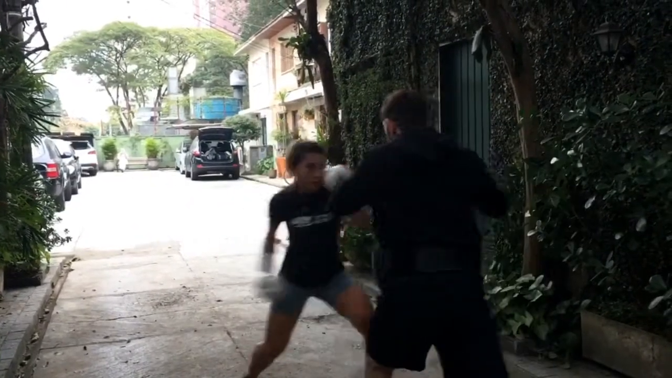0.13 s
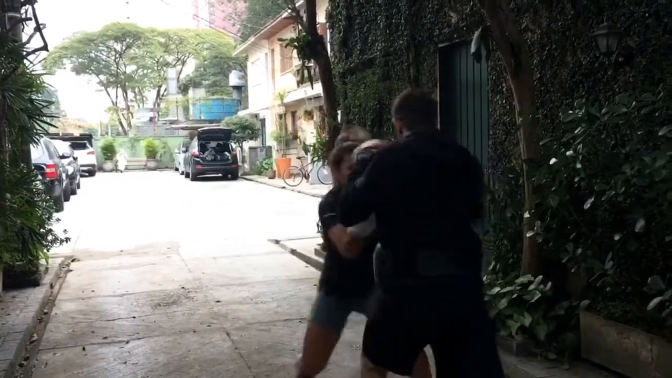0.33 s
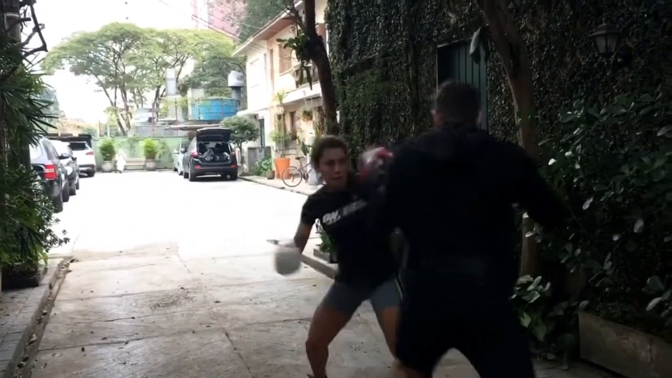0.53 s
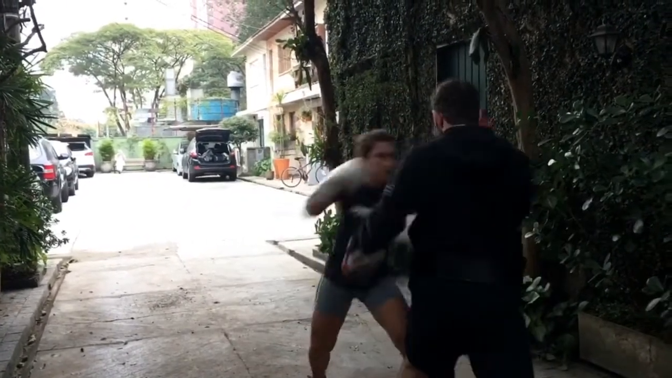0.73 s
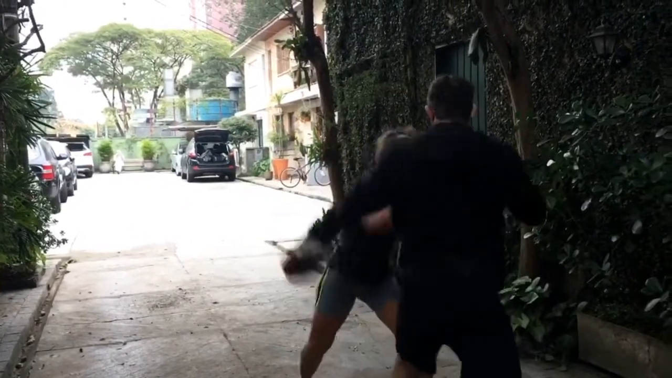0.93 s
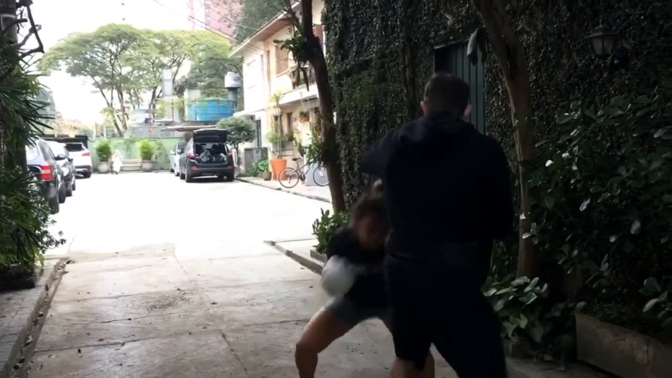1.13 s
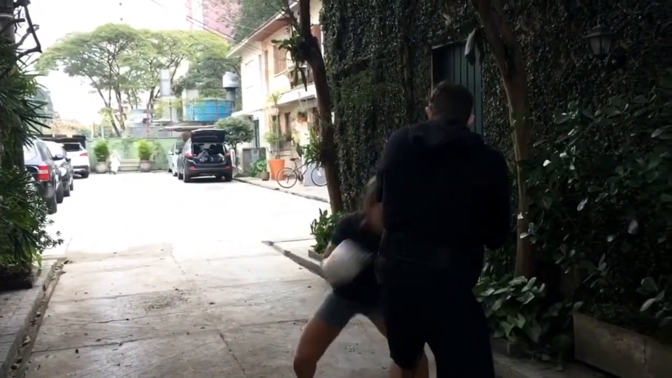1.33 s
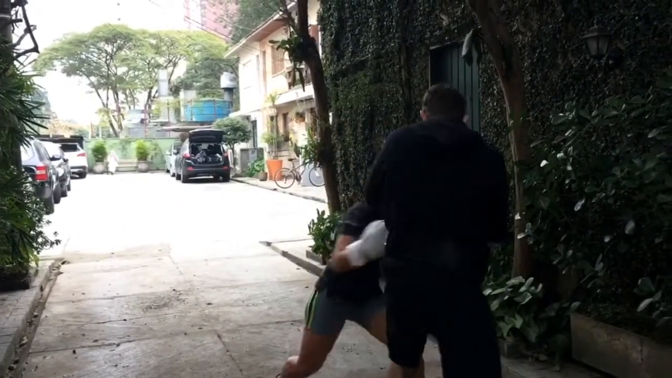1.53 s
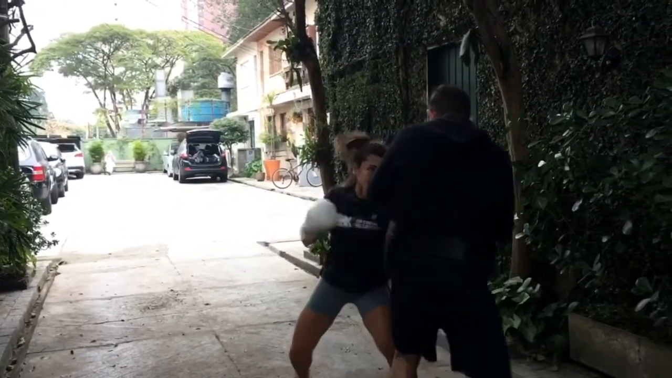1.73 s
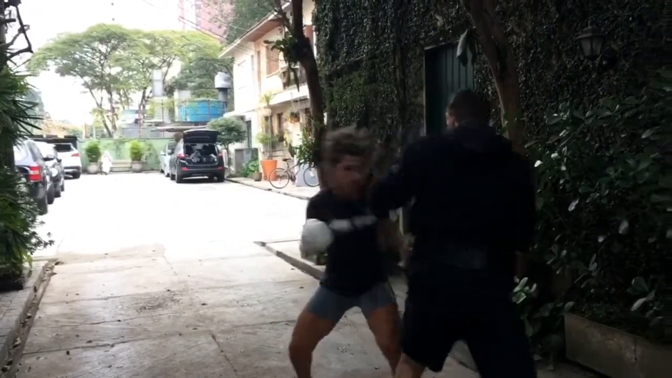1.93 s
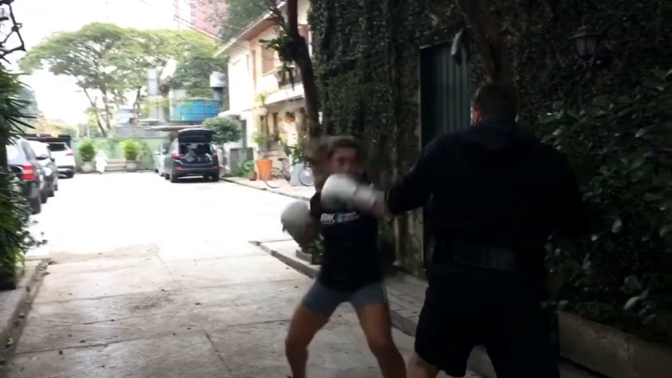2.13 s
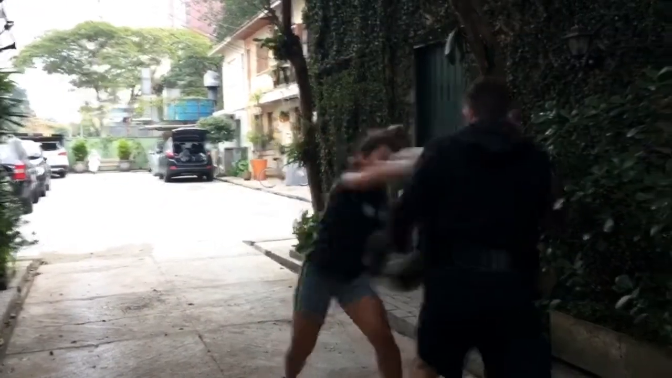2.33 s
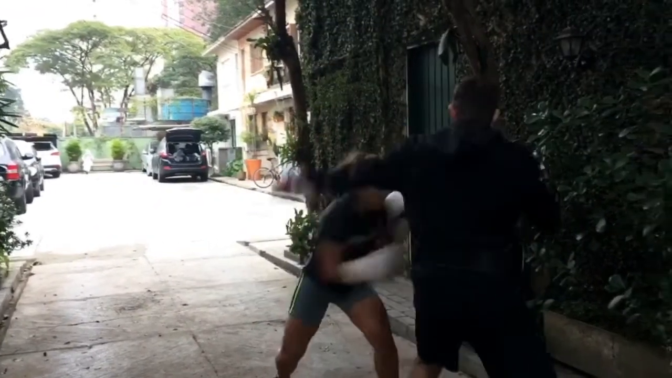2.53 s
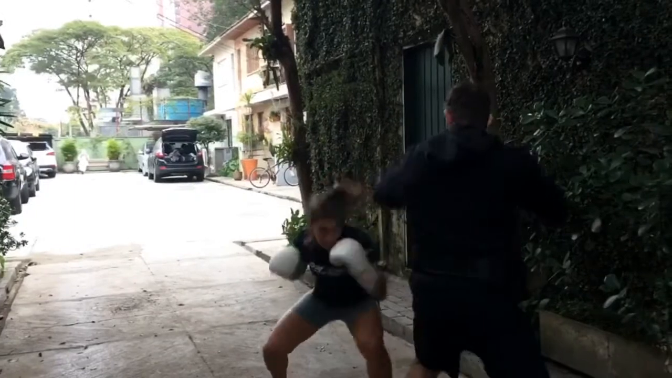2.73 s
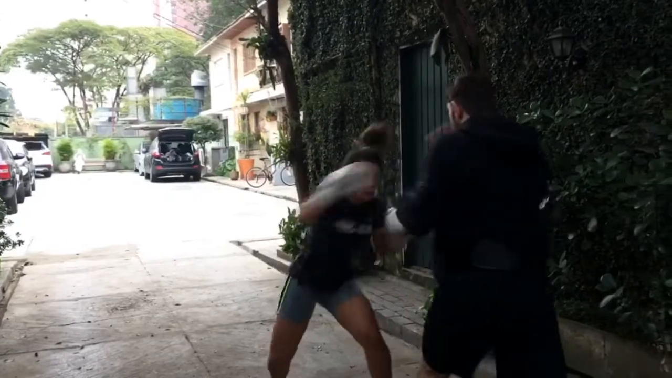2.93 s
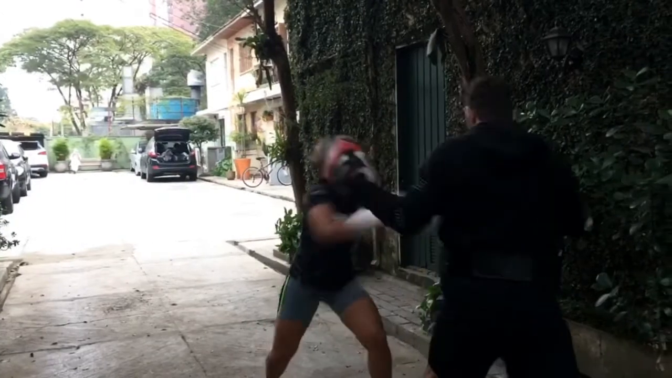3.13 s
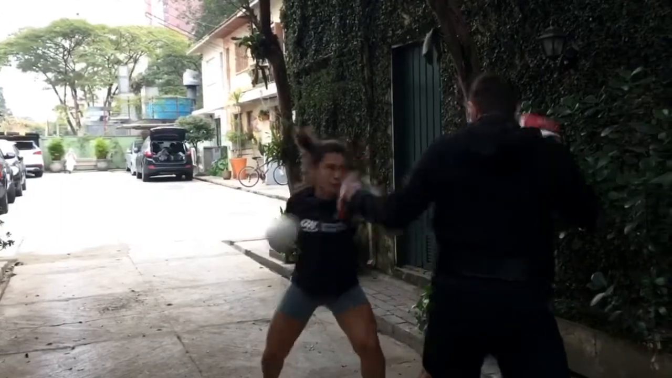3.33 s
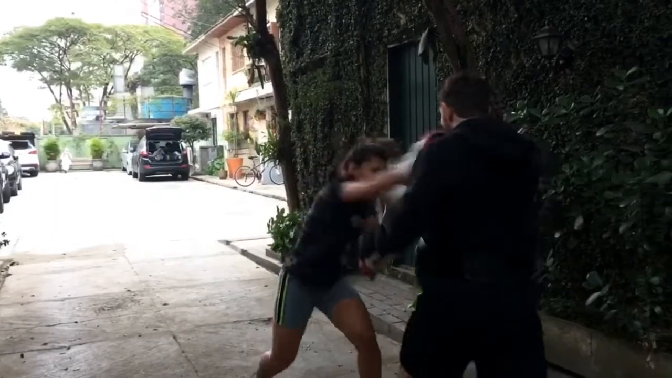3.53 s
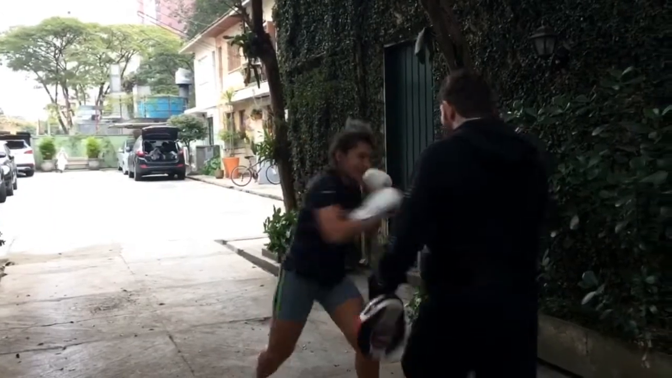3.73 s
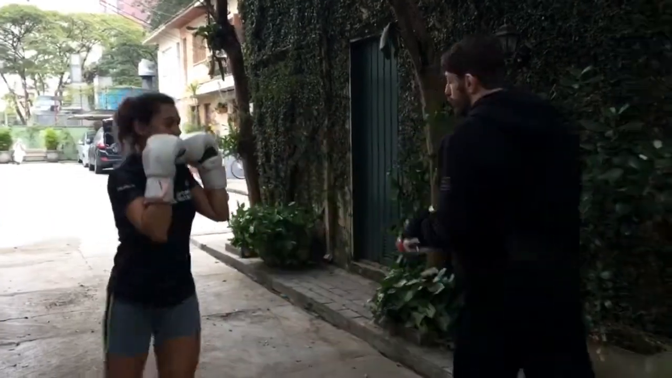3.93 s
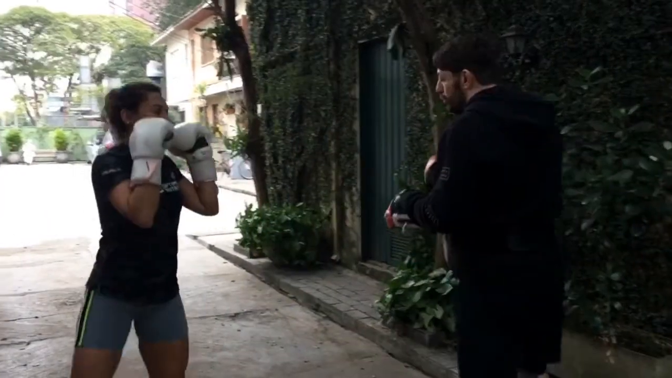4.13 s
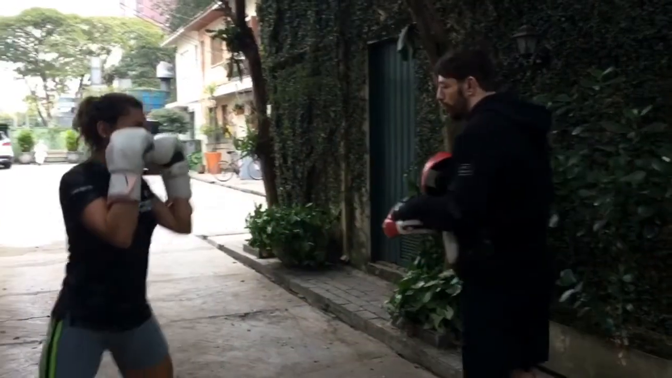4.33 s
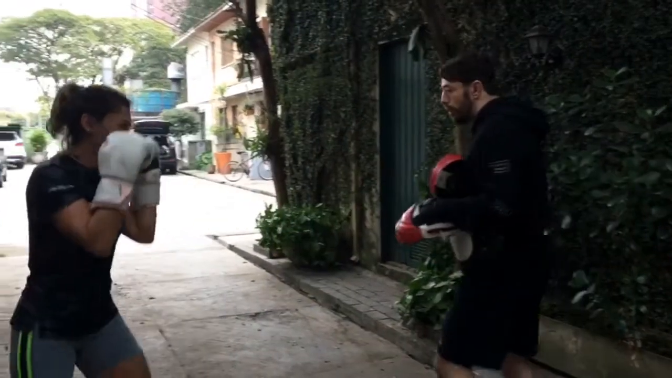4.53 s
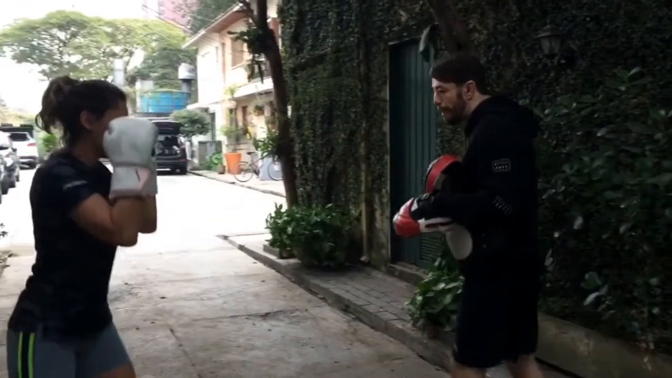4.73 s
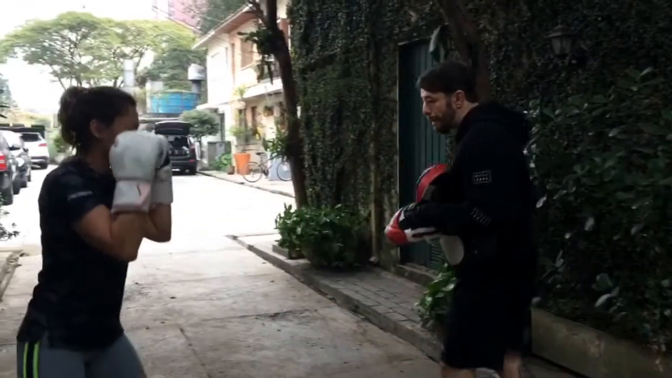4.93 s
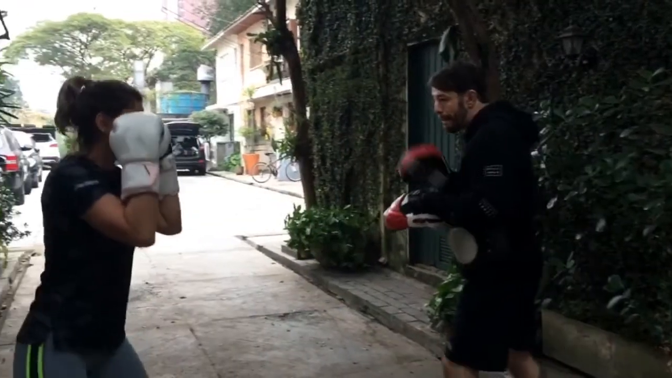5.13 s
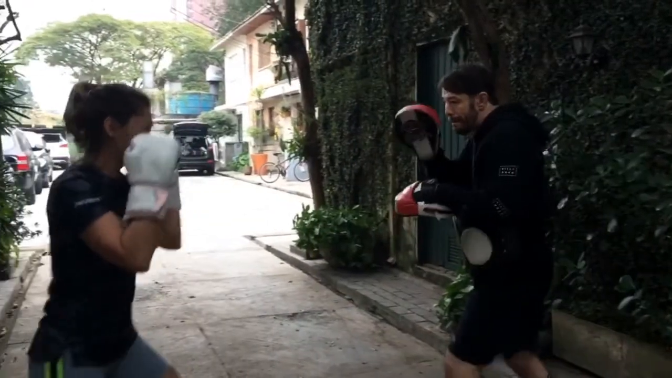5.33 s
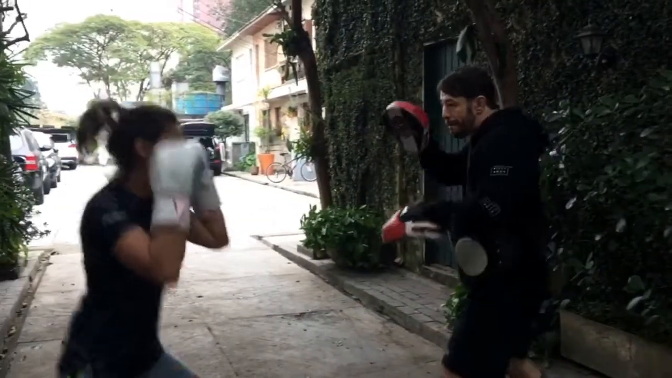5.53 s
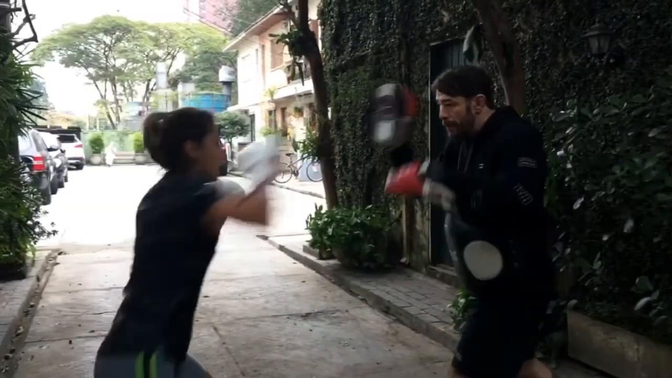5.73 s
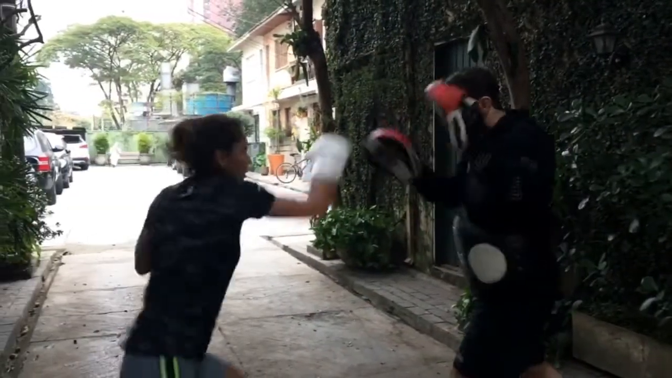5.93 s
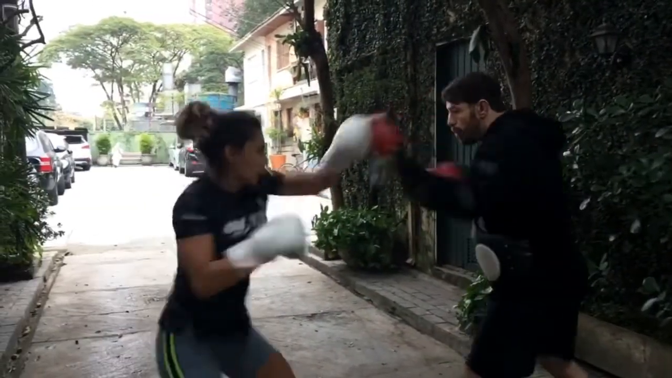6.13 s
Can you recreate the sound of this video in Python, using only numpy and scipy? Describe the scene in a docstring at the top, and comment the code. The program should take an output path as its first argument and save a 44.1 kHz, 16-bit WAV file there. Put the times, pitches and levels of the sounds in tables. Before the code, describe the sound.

Throughout, low city rumble and soft hiss lie under a faint thin motor tone; a steady low hum near 130 Hz is clear at first. Gloves hit padded mitts at about 0.16, 0.45, 0.71, 1.3, 1.6, 1.97, 2.27, 2.9, 3.16 and 3.43 s: leathery cracks with dull thuds and low body booms, short echoes from near walls. The hits at 0.71, 1.97 and 3.43 are sharpest; 2.27 is soft and smeared. Between them soles and sleeves scuff, grit ticks, and a narrow rustle hisses at 1.03. At 3.83 the hum drops steeply. A low wind puff comes at 4.2, a faint high whistle at 4.56, then a harsh bird chirp at 4.74 slides into a clear falling note at 4.82. Another puff at 5.1, scuffs, a very sharp slap at 5.7, a punchy one at 6.0, and a tiny chirp at 6.26.

```python
"""City rumble, a motor's hum and a thin band of hiss sound throughout, as shaped noise and sines.
From the start gloves slap padded mitts (noise bursts, resonances, a late boom) in an echoing paved lane,
while soles and sleeves scuff, grit ticks and, at 1.03 s, a narrow hiss rustles.
At 3.83 s the hum falls steeply; then wind puffs, a far call whistles, and harsh bird partials
slide into one falling note; another puff, two more slaps and a last short chirp follow."""
import sys
import numpy as np
from scipy import signal
from scipy.fft import rfft, irfft
from scipy.io import wavfile
from scipy.ndimage import uniform_filter1d

SR = 44100
rng = np.random.default_rng(int(sys.argv[2]) if len(sys.argv) > 2 else 0)


def to_wav(sig):
    """Store sig (one row per channel, or 1-D mono) as 16-bit WAV at the path in sys.argv[1].

    Samples outside -1..1 are clipped; the rate is SR.
    """
    pcm = np.clip(np.atleast_2d(sig), -1, 1) * 32767
    pcm = np.round(pcm).astype(np.int16)
    wavfile.write(sys.argv[1], SR, pcm.T)  # frames by channels


N = 277256  # samples
T = np.arange(N) / SR  # s

# City spectrum, shape only: hz, density_db (per Hz)
CITY_SPECTRUM = [(12, -33), (22, 8.5), (43, 5.5), (69, -4.5), (127, -14), (180, -18.5), (320, -21.5),
                 (470, -26), (1100, -26), (2500, -30), (3600, -36), (4800, -41.5), (6500, -47),
                 (9000, -50.5), (12000, -47.5), (16300, -50)]
HISS_DB, HISS_AFTER_DB, RUMBLE_DB, RUMBLE_WAVER_DB = -42.5, -43.5, -34, 0.1
STEP_S = 3.83  # the hum, and slightly the hiss, drop here

# Motor hum partials: multiple, relative_level_db, noise_width_hz
HUM_PARTIALS = [(1, 6, 7), (2, -13, 14), (3, -14.5, 8.4)]
HUM_HZ, HUM_DB, HUM_AFTER_DB, HUM_WAVER_DB = 133.8, -32, -46.5, 1.2
# Mean level of the motor's thin tone: time_s, level_db
WHINE_LEVEL = [(0, -63), (1.3, -57), (2.0, -52.5), (5.7, -53.5), (6.1, -61)]
WHINE_HZ = 2137.5

DRONE_HZ, DRONE_WIDTH_HZ, DRONE_DB, DRONE_WAVER_DB = 2790, 200, -57, 4.5

# Wind at the microphone: start_s, length_s, level_db
WIND_PUFFS = [(4.17, 0.277, -30.5), (5.1, .3, -32)]
# Wind spectrum, shape only: hz, density_db (per Hz)
WIND_SPECTRUM = [(60, -9), (120, -2.5), (190, 0.1), (300, -2), (380, -10), (480, -23), (900, -49)]

# One narrow hiss: start_s, length_s, level_db
NARROW_RUSTLE = (1.03, .14, -46)
# One far thin call: start_s, length_s, pitch_hz, level_db
FAR_WHISTLE = (4.56, .165, 3945, -53)

# Harsh bird stacks: start_s, length_s, starting_fourth_partial_hz, level_db, relative_fourth_db
BIRD_CHIRPS = [(4.735, .095, 4180, -44, 2), (6.262, .03, 4150, -44, -12)]
# Partials beside the fourth: multiple, relative_level_db
BIRD_PARTIALS = [(3, -4), (5, 1), (5.5, -13), (6, -11)]
CHIRP_RISE_HZ_PER_S = 2000  # of the fourth partial
CHIRP_ROUGH, CHIRP_BLUR_PER_S = .05, 13  # starting noise share 0-1, its growth
# One falling note: start_s, length_s, from_hz, to_hz, level_db, noise_share (0-1)
FALLING_NOTE = (4.824, .058, 4270, 3720, -30, .12)

# Cracking grit: start_s, click_peak_db, body_peak_db
GRIT_TICKS = [(0.3564, -20.5, -46), (0.8101, -38, -28), (0.9333, -48, -30), (2.505, -43, -38),
              (3.0035, -26, -27.5), (3.7664, -43, -35), (3.8204, -22, -23.5), (4.875, -35, -24),
              (6.175, -25, -28)]
# Dragging soles and sleeves: start_s, length_s, level_db, centre_hz, relative_hiss_db, resonant_share (0-1)
FRICTION_SCUFFS = [(.225, 0.058, -39, 1420, -6.5, .6), (.42, .025, -43, 960, -9, .6),
                   (.51, .045, -40, 1350, -13, 0), (.74, 0.4, -41, 2250, -17, 0),
                   (.79, 0.079, -42, 2960, -3, .55), (.925, 0.068, -39.5, 2910, -18, 0.3),
                   (1.012, .06, -40, 2840, -12, .5), (1.072, 0.16, -46, 2860, -10.5, 0.1),
                   (1.392, 0.14, -39, 1600, -32, 0.57), (2.182, .07, -45.5, 1530, -11, 0.3),
                   (2.28, 0.065, -43, 2250, -1, .2), (2.503, 0.042, -41.5, 1750, -15, 0.1),
                   (2.549, 0.033, -34, 990, -30, .9), (2.582, 0.046, -41, 2270, -16, 0.1),
                   (2.805, 0.098, -33, 1910, -17, 0.5), (2.896, 0.052, -38, 1460, -26, 0.6),
                   (3.712, .1, -35, 1480, -32, 0.43), (5.662, .033, -40, 2060, -10, 0.1),
                   (6.075, 0.11, -38.5, 1450, -7, 0.07)]

# Near-wall echoes before dulling: shortest_delay_s, level_db
NEAR_WALLS = [(.005, -8), (.009, -10), (.016, -15), (0.021, -15)]
# Reverberation of the lane: hz, t60_s
LANE_DECAY = [(100, 0.63), (400, 0.23), (1500, 0.31), (4000, 0.28), (12000, 0.28)]
FAR_WALL_S, FAR_WALL_DB = .031, -23

# Slaps, and two sharp wall echoes of slaps (1.990, 3.462); levels are those before the lane:
# start_s, crackle_peak_db, crack_peak_db, thud_peak_db, thud_tilt_db (per octave),
# boom_peak_db, leather_tilt_db (per octave), rise_ms (time constant), squash_ms (t60)
SLAPS = [ (0.157, -15, -21, -16, 1, -15, 1.5, 12, 87), (0.447, -13.5, -25, -10, 2, -13.5, 3.5, 1.14, 81),
         (0.7082, -8.5, -13, -4, 4, -12, 1, 4, 30), (.716, -7, -13.5, -37, .1, -34, -4, 0.48, 35),
         (1.310, -19.5, -23, -17.5, 5, -17.5, 4, 1.9, 56), (1.622, -10.5, -23, -10, -4, -23, 4.5, 2.1, 61),
         (1.974, -2.5, -7.5, -7, 7, -22, 2.5, 0.94, 38), (1.990, -41, -0.5, -23, -8, -40, -0.5, 0.44, 44),
         (2.267, -18.5, -40, -17.5, -0.5, -18.5, 2, 9.9, 135),
         (2.885, -21, -19.5, -16.5, -5, -35, 1, 1.2, 53),
         (3.159, -8.5, -36, -2.5, -7, -11.5, -12, 0.79, 41),
         (3.4305, -5, -26, -1.5, -3, -14, 0.4, 0.46, 88), (3.462, -28, -3.5, -28, -1, -40, -5, 0.81, 31),
         (5.6958, -9.5, 1, -6, 0.5, -17.5, 0, 1, 98), (6.0096, -4, -8, -6, -15, -16, 1.5, 0.27, 54)]
# Resonances of the padding before the tilt: hz, width_hz, relative_level_db
PADDING_MODES = [(143.4, 44, 12.5), (183, 127, 18.5), (255, 46, 17.5), (320, 39, 7), (464, 300, -28),
                 (633, 120, 14)]
# The body sways under the blow: hz, width_hz, delay_s (before the rise time is added)
BODY_BOOM = (48.5, 41, 0.0197)
# Leather spectrum before the tilt, shape only: hz, density_db (per Hz)
LEATHER_SPECTRUM = [(200, -28), (400, -15.5), (800, 0.5), (1700, -2.5), (2500, -8.5), (3500, -11),
                    (4800, -22), (6500, -25.5), (9000, -30), (12000, -30), (16000, -45)]

# Treble response of the microphone: hz, response_db
MICROPHONE_RESPONSE = [(3900, 1.24), (4300, -2), (4800, -7), (5400, -3), (6300, -1.3), (9600, -6.5),
                       (10300, -14), (11500, -11), (13000, -15)]
EDGE_HZ = 16150  # upper band limit


def gain_of(db):
    """Definition of the decibel: amplitude ratio from level."""
    return 10 ** (np.asarray(db) / 20)


def evened(x):
    """Normalization to unit root-mean-square power."""
    return x / np.sqrt(np.mean(x ** 2) + 1e-20)


def peaked(x):
    """Normalization to unit peak amplitude."""
    return x / abs(x).max()


def read(points, hz):
    """Interpolation of a curve along logarithmic frequency."""
    f, value = np.transpose(points)
    return np.interp(np.log(hz + 1), np.log(f + 1), value)


def add(mix, s, sound):
    """Superposition: a sound is summed into the mix from s seconds on."""
    part = mix[round(s * SR):][:len(sound)]
    part += sound[:len(part)]


def coloured(x, db_at):
    """Linear filtering: the spectrum is multiplied by the gain db_at(hz)."""
    hz = np.fft.rfftfreq(len(x), 1 / SR)
    return irfft(rfft(x) * gain_of(db_at(hz)), len(x))


def resonate(x, hz, width):
    """Resonance by heterodyning: hz is shifted to zero, smoothed, and shifted back."""
    turn = np.exp(2j * np.pi * np.cumsum(hz * np.ones(len(x))) / SR)
    r = np.exp(-np.pi * width / SR)
    smooth = signal.lfilter([1 - r], [1, -r], x / turn + 1e-18)
    return 2 * (turn * smooth).real


def evenly_spread(x):
    """Spectral averaging: fine colour is levelled while energy and broad spectrum stay."""
    spectrum = rfft(x, 2 * len(x))
    broad = np.sqrt(uniform_filter1d(abs(spectrum) ** 2, size=len(x) // 50 + 1) + 1e-20)
    fine = abs(spectrum) / broad
    even = irfft(spectrum / np.maximum(fine, .3))[:len(x)]
    return even * np.linalg.norm(x) / np.linalg.norm(even)


def stroke(length, peak, ends_db):
    """Envelope of exponential growth and decay: straight lines in dB, with soft edges."""
    u = np.linspace(0, 1, round(length * SR))
    level_db = np.interp(u, [0, peak, 1], [ends_db, 0, ends_db])
    return gain_of(level_db) * signal.windows.tukey(len(u), .15)


def waver(db, top_hz):
    """Slow amplitude modulation by 16 sines of random phase."""
    hz = np.geomspace(.2, top_hz, num=16)[:, None]
    sines = np.sin(2 * np.pi * (hz * T + rng.random(hz.shape)))
    return gain_of(db * evened((sines / np.sqrt(hz)).sum(0)))


def stepped(db, after_db):
    """Step in level: a 23 ms ramp in dB from one gain to another."""
    return gain_of(db + (after_db - db) * np.clip((T - STEP_S) / 0.023, 0, 1))


def city(patchy_db=0.82):
    """Superposition of distant sources: noise with drifting spectral patches, as rumble and hiss."""
    frames = N // 256 + 5
    a, b, patches = rng.standard_normal((frames, 513, 3)).T
    patches = evened(uniform_filter1d(uniform_filter1d(patches, 14, 0), 12, 1))
    spectra = (a + 1j * b) * gain_of(patchy_db * patches)
    white = signal.istft(spectra, nperseg=1024, noverlap=768)[1][:N]
    low = lambda f: -10 * np.log10(1 + (f / 110) ** 6)
    high = lambda f: low(110 ** 2 / (f + 1))  # the low-pass mirrored about 110 Hz
    rumble = evened(coloured(white, lambda f: read(CITY_SPECTRUM, f) + low(f)))
    hiss = coloured(white, lambda f: read(CITY_SPECTRUM, f) + high(f))
    # the hiss level refers to the band from 500 to 4000 Hz
    hiss = hiss / np.std(coloured(hiss, lambda f: -100 * ((f < 500) | (f > 4000))))
    rumble = gain_of(RUMBLE_DB) * waver(RUMBLE_WAVER_DB, top_hz=3.3) * rumble
    return stepped(HISS_DB, HISS_AFTER_DB) * hiss + rumble


def motor():
    """Harmonic radiation: hum partials, part tone and part narrow noise, and a thin whine."""
    noise = rng.standard_normal(N)
    hum = np.zeros(N)
    for multiple, db, width in HUM_PARTIALS:
        hz = multiple * HUM_HZ
        tone = np.sin(2 * np.pi * hz * T)
        hum += gain_of(db) * (0.41 * tone + 0.35 * evened(resonate(noise, hz, width)))
    whine = np.sqrt(2) * np.sin(2 * np.pi * WHINE_HZ * T)
    whine = whine * gain_of(np.interp(T, *np.transpose(WHINE_LEVEL))) * waver(2.6, top_hz=8.0)
    return stepped(HUM_DB, HUM_AFTER_DB) * waver(HUM_WAVER_DB, top_hz=2.88) * hum + whine


def drone():
    """Band-limited noise: a faint band of hiss under slow amplitude modulation."""
    band = resonate(rng.standard_normal(N), DRONE_HZ, DRONE_WIDTH_HZ)
    band = resonate(band, DRONE_HZ, DRONE_WIDTH_HZ)
    return gain_of(DRONE_DB) * waver(DRONE_WAVER_DB, top_hz=3.3) * evened(band)


def puff(length, db):
    """Turbulence at the microphone port: low noise of lumpy intensity."""
    level = stroke(length, peak=0.11, ends_db=-13)
    lumps = gain_of(2.3 * evened(uniform_filter1d(rng.standard_normal(len(level)), 400)))
    air = coloured(rng.standard_normal(len(level)) * lumps, lambda f: read(WIND_SPECTRUM, f))
    return gain_of(db) * level * evened(air)


def rustle(length, db):
    """Resonant filtering of noise: a short narrow hiss."""
    level = stroke(length, peak=0.63, ends_db=-1.0)
    hiss = resonate(resonate(rng.standard_normal(len(level)), 4300, 500), 4300, 500)
    return gain_of(db) * level * evened(hiss)


def whistle(length, hz, db):
    """Simple harmonic tone with narrow noise about it: a far call, slightly fuzzy."""
    level = stroke(length, peak=.45, ends_db=-4.5)
    tone = np.sqrt(2) * np.sin(2 * np.pi * hz * T[:len(level)])
    fuzz = 0.85 * evened(resonate(rng.standard_normal(len(level)), hz, 60))
    return gain_of(db) * level * (tone + fuzz)


def partial(hz, rough):
    """Phase is the integral of frequency: one gliding bird partial, part tone and part noise."""
    rough = np.clip(rough, 0, 1)
    tone = np.sqrt(2) * np.sin(2 * np.pi * np.cumsum(hz) / SR)
    blur = resonate(resonate(rng.standard_normal(len(hz)), hz, 600), hz, 600)
    return (1 - rough) * tone + rough * evened(blur)


def chirp(length, fourth_hz, db, fourth_db):
    """Superposed partials of a bird call, climbing together and blurring into noise."""
    t = np.arange(round(length * SR)) / SR
    hz = (fourth_hz + CHIRP_RISE_HZ_PER_S * t) / 4
    rough = CHIRP_ROUGH + CHIRP_BLUR_PER_S * t
    stack = BIRD_PARTIALS + [(4, fourth_db)]
    call = sum(gain_of(d) * partial(k * hz, rough) for k, d in stack)
    return gain_of(db) * call * signal.windows.tukey(len(t), .15)


def fall(length, from_hz, to_hz, db, rough):
    """Frequency glide: one falling bird note."""
    level = stroke(length, peak=.55, ends_db=-8.0)
    hz = from_hz + (to_hz - from_hz) * np.linspace(0, 1, len(level)) ** 1.4
    return gain_of(db) * level * partial(hz, rough)


def tick(db, body_db):
    """Impulsive fracture of a grain: a differentiated bright click with a resonant dull body."""
    t = np.arange(300) / SR
    burst = rng.standard_normal(len(t)) * gain_of(-60 * t / 0.0063)
    click = gain_of(db) * peaked(np.diff(burst, prepend=0))
    return click + gain_of(body_db) * peaked(resonate(burst, 1500, 1800))


def scuff(length, db, hz, hiss_db, focus):
    """Friction excites dense grit, heard as resonance, wide rasp and hiss."""
    level = stroke(length, peak=0.29, ends_db=-6.5)
    lumps = gain_of(2.6 * evened(uniform_filter1d(rng.standard_normal(len(level)), 150)))
    grit = rng.standard_normal(len(level)) * lumps
    rasp = evened(coloured(grit, lambda f: -8 * np.log2(f / 2200 + 0.012) ** 2))
    hiss = evened(coloured(grit, lambda f: read(LEATHER_SPECTRUM, f) - 40 * (f < 5000)))
    ring = evened(resonate(resonate(grit, hz, 1030), hz, 1030))
    # power is shared between resonance and rasp
    body = np.sqrt(focus) * ring + np.sqrt(1 - focus) * rasp
    return gain_of(db) * level * (body + gain_of(hiss_db) * hiss)


def lane(x, wet_db):
    """Reflection and reverberation: dulled wall echoes, then random taps decaying band by band."""
    # every sound draws a new pattern
    taps, walls = np.zeros((2, SR // 2))
    at = np.arange(300, len(taps) - 20, 20)
    taps[at + rng.integers(0, 20, len(at))] = rng.choice([-1., 1.], len(at))
    hz, t, z = signal.stft(taps, SR, nperseg=256)
    decay = gain_of(-60 * t / read(LANE_DECAY, hz)[:, None])
    tail = signal.istft(z * decay, SR, nperseg=256)[1][:len(taps)]
    for (s, db), shift in zip(NEAR_WALLS, rng.uniform(-1, 1, len(NEAR_WALLS))):
        add(walls, s * (1 + .2 * abs(shift)), np.sign(shift) * gain_of([db]))
    walls = signal.lfilter([.55], [1, -.45], walls)  # the echoes lose treble
    walls[0] = 1  # direct sound
    # scattered sound left the source in all directions, so its fine colour averages out
    scattered = signal.fftconvolve(evenly_spread(x), tail / np.linalg.norm(tail))
    return signal.fftconvolve(x, walls) + gain_of(wet_db) * scattered


def punch(db, crack_db, thud_db, thud_tilt_db, boom_db, tilt_db, rise_ms, squash_ms):
    """Impact: expelled air cracks, flattening leather crackles, padding resonates, the body booms."""
    t = np.arange(SR // 4) / SR
    rise = (1 - np.exp(-1000 * t / rise_ms)) ** 2
    skin = lambda hz: read(LEATHER_SPECTRUM, hz) + tilt_db * np.log2((hz + 100) / 1500)

    lumps = gain_of(4.75 * evened(uniform_filter1d(rng.standard_normal(len(t)), 60)))
    grit = rng.standard_normal(len(t)) * lumps
    crackle = coloured(grit, skin) * rise * gain_of(-60000 * t / squash_ms)
    crackle = evenly_spread(crackle)  # many small contacts at once leave no single pitch

    pop = coloured(rng.standard_normal(len(t)), lambda hz: .5 * skin(hz))
    crack = pop * np.minimum(t / .0001, 1) * gain_of(-60 * t / 0.0038)

    push = rng.standard_normal(len(t)) * rise * gain_of(-60 * t / 0.053)
    thud = np.zeros(len(t))
    for hz, width, mode_db in PADDING_MODES:
        mode_gain = gain_of(mode_db + thud_tilt_db * np.log2(hz / 280))
        thud += mode_gain * peaked(resonate(push, hz, width))

    hz, width, late = BODY_BOOM
    u = np.maximum(t - late - rise_ms / 1000, 0)
    boom = -np.sin(2 * np.pi * hz * u) * u * np.exp(-np.pi * width * u)

    near = gain_of(db) * peaked(crackle) + gain_of(crack_db) * peaked(crack)
    near = near + gain_of(thud_db) * peaked(thud)
    # far-wall echo; the roll is circular
    near = near + gain_of(FAR_WALL_DB) * np.roll(near, round(FAR_WALL_S * SR))
    slap = lane(near, wet_db=-4.0)
    add(slap, 0, gain_of(boom_db) * peaked(boom))  # the boom has no echoes
    return slap


def scene():
    """Superposition of the steady background and all timed sounds."""
    mix = city() + motor() + drone()
    direct = ((WIND_PUFFS, puff), ([NARROW_RUSTLE], rustle), ([FAR_WHISTLE], whistle),
              (GRIT_TICKS, tick), (FRICTION_SCUFFS, scuff), (SLAPS, punch))
    for table, source in direct:
        for s, *row in table:
            add(mix, s, source(*row))
    for table, source in ((BIRD_CHIRPS, chirp), ([FALLING_NOTE], fall)):
        for s, *row in table:
            add(mix, s, lane(source(*row), wet_db=-9.0))
    return mix[None]


def record(dry):
    """Transduction: the microphone colours the treble, rounds off high peaks and limits the band."""
    heard = coloured(dry[0], lambda hz: read(MICROPHONE_RESPONSE, hz))
    over = np.maximum(abs(heard) - .62, 0)
    soft = heard - np.sign(heard) * (over - .3 * np.tanh(over / .3))
    band_limit = signal.firwin(511, EDGE_HZ, window=("kaiser", 9), fs=SR)
    return signal.oaconvolve(soft, band_limit, "same")[None]


dry = scene()
out = record(dry)
to_wav(out)
```